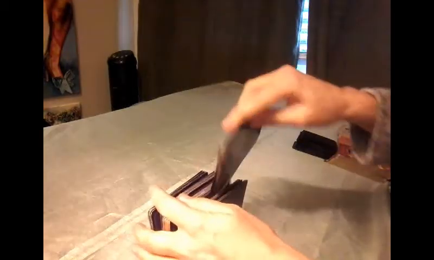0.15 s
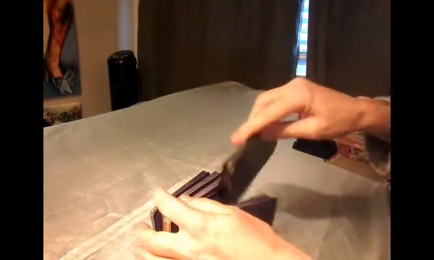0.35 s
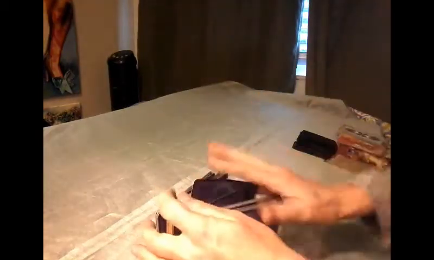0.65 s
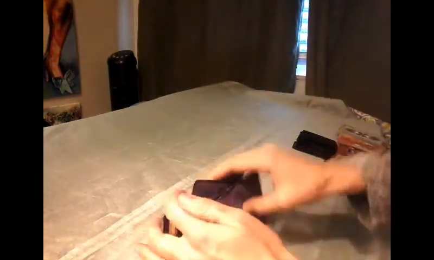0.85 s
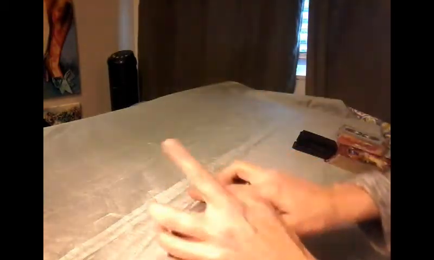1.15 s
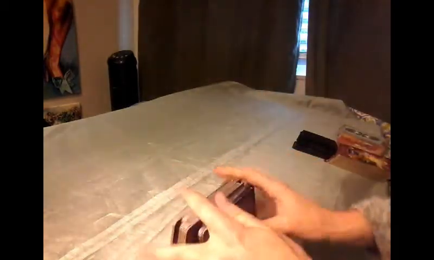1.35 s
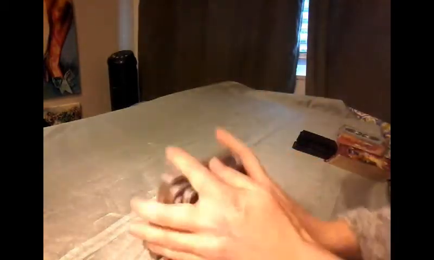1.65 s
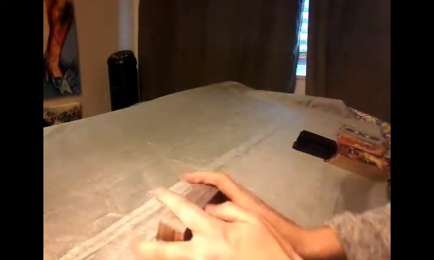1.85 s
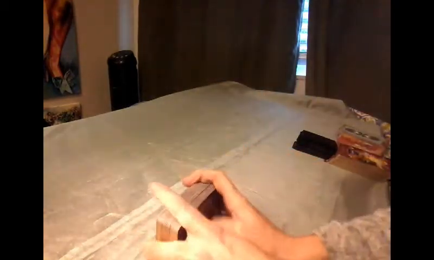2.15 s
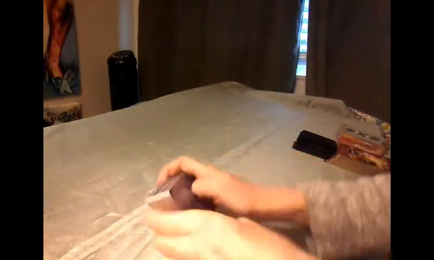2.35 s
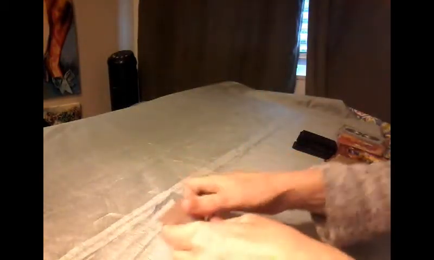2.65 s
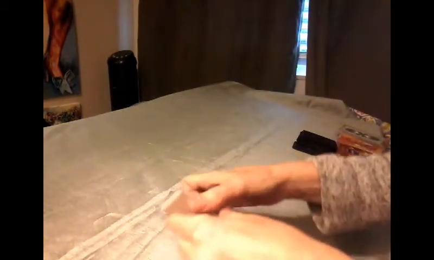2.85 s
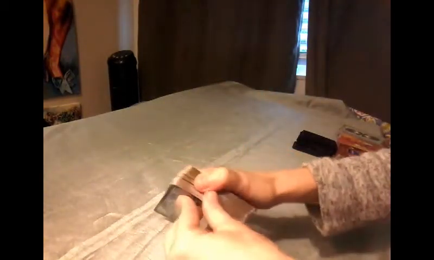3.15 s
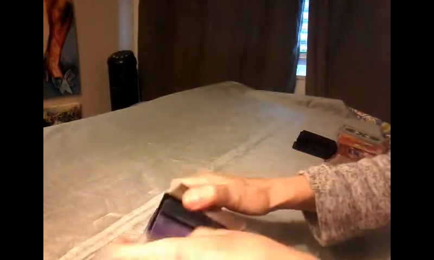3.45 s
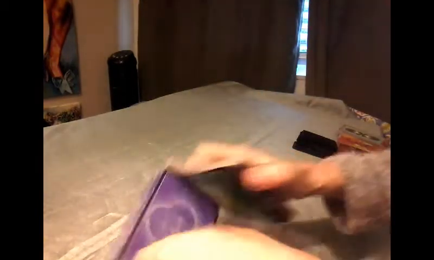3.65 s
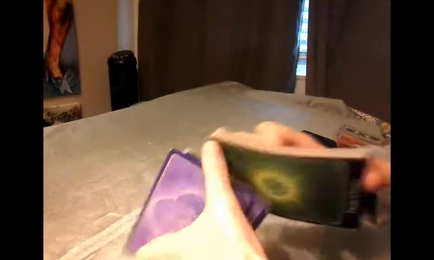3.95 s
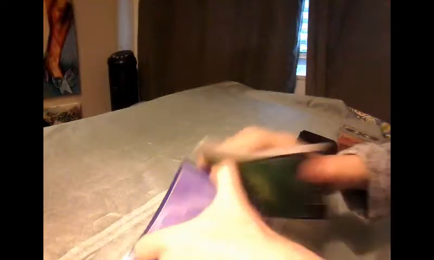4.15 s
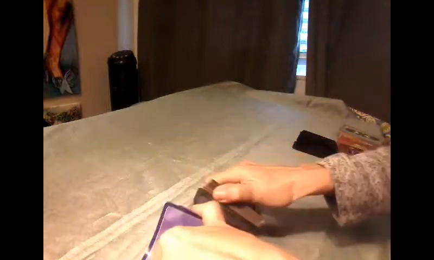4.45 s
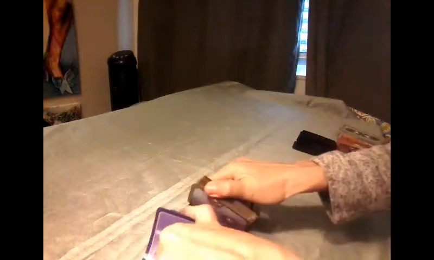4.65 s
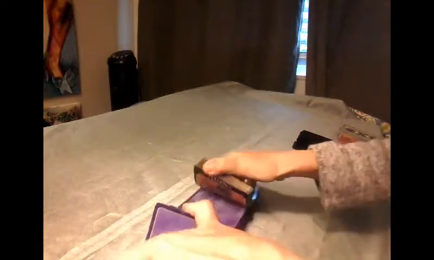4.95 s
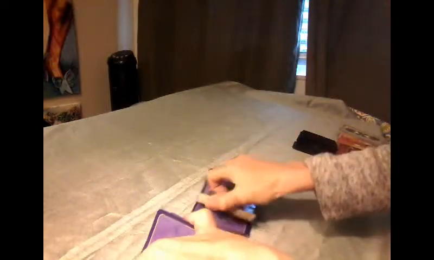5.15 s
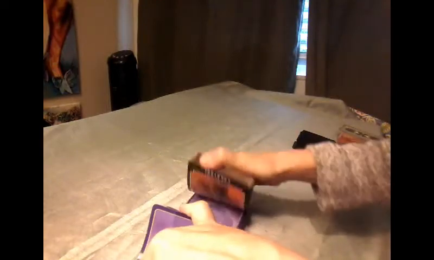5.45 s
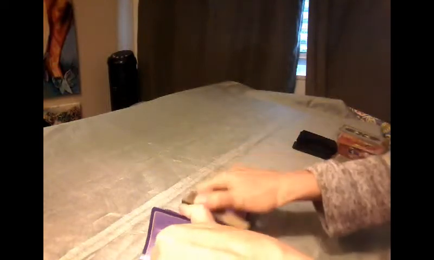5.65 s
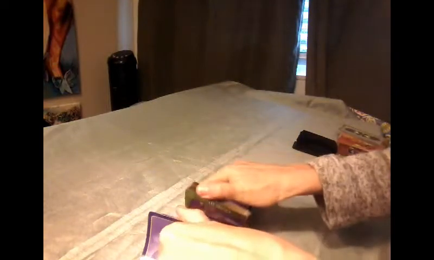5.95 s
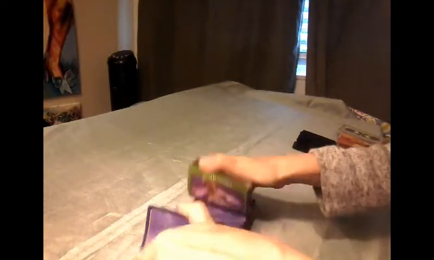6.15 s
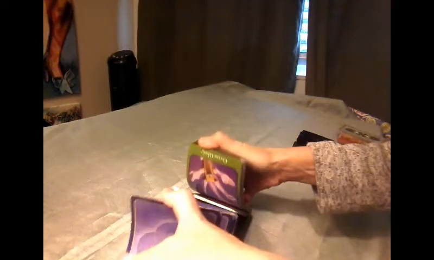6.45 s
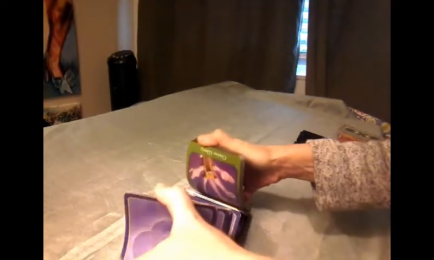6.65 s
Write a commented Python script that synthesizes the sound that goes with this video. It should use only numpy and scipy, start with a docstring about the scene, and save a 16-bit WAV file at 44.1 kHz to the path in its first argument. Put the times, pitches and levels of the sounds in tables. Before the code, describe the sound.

Large cards brush softly, then packets drop and knock square with dull thuds; later two crisp riffling snaps, over a humming fan in a small room.

```python
"""Card faces brush softly, then packets of large cards drop and are knocked square with dull thuds.
The deck is close to the microphone, on a cloth-covered table in a small, quiet room with a humming fan.
Twice a bent packet is let go and its edges snap down one after another; cards slide and tick between.
Blows with random chatter excite resonances of deck, card and pile; slides and fan air are coloured
noise, the hum is wavering sines, and decaying noise gives the room's echoes."""
import sys
import numpy as np
from scipy import signal
from scipy.fft import rfft, irfft
from scipy.io import wavfile
from scipy.ndimage import uniform_filter1d

SR = 44100
rng = np.random.default_rng(int(sys.argv[2]) if len(sys.argv) > 2 else 0)


def log_audio(samples):
    """Write samples as a 16-bit WAV file to the path given in sys.argv[1]."""
    # one column per channel
    frames = np.atleast_2d(samples).T
    # limit to full scale, then quantise
    limited = np.clip(frames, -1, 1)
    pcm = np.round(limited * 32767).astype(np.int16)
    wavfile.write(sys.argv[1], SR, pcm)


N = 300321
TIME = np.arange(N) / SR

# strokes of card face over card face: middle_s, half_length_s, level_db
SLIDES = [(0.316, 0.074, -59.5), (0.554, 0.049, -57), (0.866, 0.031, -40.5), (1.071, 0.066, -55.5),
          (1.489, 0.034, -48), (2.232, 0.063, -50), (2.42, 0.0082, -47.5), (2.506, 0.11, -58),
          (3.614, 0.028, -58), (4.22, 0.014, -59), (4.467, 0.025, -45), (4.522, 0.035, -54),
          (5.02, 0.054, -55), (5.229, 0.044, -53), (5.588, 0.023, -57), (6.457, 0.031, -59.5),
          (6.792, 0.023, -48.5)]


def from_db(db):
    """Decibels to gain."""
    return 10 ** (np.asarray(db) / 20)


def unit(x):
    """Scale to rms 1."""
    return x / np.sqrt(np.mean(x ** 2))


def burst(x, db):
    """Scale a short sound so that its energy, spread over 3 ms, has this level."""
    return x * from_db(db) * np.sqrt(0.003 * SR / np.sum(x ** 2))


def add(track, start_s, x):
    """Mix x into the track at start_s."""
    i = int(np.clip(start_s * SR, 0, N - 1))
    track[i:i + len(x)] += x[:N - i]


def colour(x, points):
    """Filter by a (Hz, dB) spectrum, interpolated over log frequency."""
    hz, db = np.transpose(points)
    bins_hz = np.maximum(np.fft.rfftfreq(len(x), 1 / SR), 1)
    gain = from_db(np.interp(np.log(bins_hz), np.log(hz), db))
    return irfft(rfft(x) * gain, len(x))


def ring(x, modes):
    """Sum of damped resonances; neighbours swing in opposite directions."""
    out = np.zeros(len(x))
    for k, (hz, width_hz, db) in enumerate(modes):
        b, a = signal.iirpeak(min(hz, SR / 2 - 2000), hz / width_hz, SR)
        out += (-1) ** k * from_db(db) * signal.lfilter(b, a, x)
    return out


def soften(x, hz, order=2):
    """Low-pass: a soft contact cannot excite what is faster than itself."""
    return signal.sosfilt(signal.butter(order, hz, fs=SR, output="sos"), x)


def walk(rate_hz):
    """Slow random wander of rms near 1: random steps, smoothed."""
    hold = int(SR / rate_hz)
    steps = np.repeat(rng.standard_normal(N // hold + 1), hold)
    return unit(uniform_filter1d(steps, hold)[:N])


def contact(decay_s, chatter, evenness, size=4096):
    """One blow and the dying chatter of neighbouring cards; evenness 0-1 tames its chance colour."""
    push = rng.standard_normal(size) * np.exp(-np.arange(size) / SR / decay_s)
    push *= chatter / np.sqrt(np.sum(push ** 2))
    push[0] += 1  # the blow itself
    spectrum = rfft(push)
    tint = irfft(np.log(uniform_filter1d(abs(spectrum) ** 2, size=24)))
    tint[size // 2:] = 0  # causal, so the attack stays sharp
    return irfft(spectrum * np.exp(-np.clip(evenness, 0, 1) * rfft(tint)))


def crack(push):
    """The bare edge of a card rings high and briefly."""
    # resonances of a card's stiff edge: centre_hz, width_hz, level_db
    edge = [(4385, 860, 6.5), (5720, 4600, -2), (8720, 3740, -2.5), (15900, 4000, -10.5)]
    return unit(ring(np.diff(push, prepend=0), edge))


def knocks():
    """Thuds of the deck through the cloth: the direct sound and what goes out into the room."""
    # thuds at the table, and one early echo of the first from the ceiling (at 0.623 s):
    # start_s, level_db, contact_cutoff_hz
    thud_list = [(0.5998, -16.5, 2800), (0.6016, -10, 4700), (0.623, -22, 4700), (0.649, -14.5, 2110),
                 (0.792, -33.5, 600), (0.8198, -33.5, 2160), (0.8251, -27, 2170), (0.88, -26, 1070),
                 (1.2633, -29.5, 2170), (1.2715, -33.5, 2720), (1.2803, -31, 2260), (1.8028, -24, 1680),
                 (1.8097, -11, 1650), (1.821, -14, 1840), (1.829, -16, 1820), (1.8371, -16.5, 2790),
                 (1.845, -10.5, 3210), (1.8505, -19, 3750), (2.2372, -37.5, 1790), (2.2633, -33, 2420),
                 (2.2751, -30, 2050), (2.522, -53, 352), (4.4744, -31, 1100), (4.541, -29, 1320),
                 (5.719, -37, 805), (5.774, -34.5, 700), (5.7973, -29.5, 574)]
    # resonances of the deck on the table: centre_hz, width_hz, level_db
    deck = [(123.3, 24, 3.5), (258, 118, 3.5), (646, 370, 3), (1520, 400, 0), (2320, 550, -2),
            (4000, 540, -6.5), (5950, 840, -7)]
    firm_db, firm_hz = -12, 2500  # the reference, a firm knock
    direct, send = np.zeros(N), np.zeros(N)
    for start_s, db, cutoff_hz in thud_list:
        lighter_db = firm_db - db
        # a lighter knock has more bare card edge in it
        edge_db = -36.5 + 0.63 * lighter_db
        # a crisper or firmer one fills the room more: 3 dB per octave, 0.12 dB per dB
        room_db = 3 * np.log2(cutoff_hz / firm_hz) - 0.12 * lighter_db
        push = contact(decay_s=0.0023, chatter=1.0, evenness=0.51)
        # the cloth takes the top off; a trace of bare card edge gets through
        body = unit(soften(ring(push, deck), cutoff_hz, order=6))
        thud = burst(body + from_db(edge_db) * crack(push), db)
        add(direct, start_s, thud)
        add(send, start_s, thud * from_db(room_db))
    return direct, send


def card(db, flex_hz, crack_db, ring_s, pile_db):
    """A card flexes with one broad note, cracks at its edge and nudges the pile under it."""
    # resonances of the pile under the card: centre_hz, width_hz, level_db
    pile = [(1334, 206, 0), (800, 620, -6.5), (524, 324, -7), (165, 230, -12.5)]
    push = contact(ring_s, chatter=2.05, evenness=0.59)
    flex = ring(push, [(flex_hz, 900, 0)])  # 900 Hz wide
    body = flex - from_db(pile_db) * ring(push, pile)
    return burst(unit(soften(body, 5900)) + from_db(crack_db) * crack(push), db)


def snaps():
    """A bent packet is let go: its cards snap down one after another."""
    # cards snapping down: start_s, level_db, flex_hz, edge_crack_db, ring_s
    falling_cards = [(4.537, -30.5, 1800, 0, 0.0052), (4.543, -34.5, 1900, -1, .0024),
                     (4.5725, -15, 2270, -23, 0.00089), (4.5744, -15.5, 3920, -13, 0.0016),
                     (4.6249, -13, 2500, -1.5, 0.003), (4.626, -15.5, 3500, -14, 0.0028),
                     (4.635, -13.5, 1900, -20, 0.0033), (4.651, -19.5, 1520, -13, 0.0035),
                     (4.6836, -15, 2100, -13, .0035), (4.693, -32, 2300, -6, .002),
                     (4.7027, -12, 2400, -3, 0.0013), (4.712, -25, 2610, 5, .005),
                     (4.7313, -15.5, 3600, 1.5, .0007), (4.741, -17, 2240, -2, .003),
                     (5.8141, -13, 2340, -1.5, 0.0015), (5.829, -14, 3200, -1.5, 0.0019),
                     (5.8366, -26.5, 3400, 1.5, .002), (5.8615, -12.5, 2800, -3.5, 0.00049),
                     (5.868, -12, 2900, 11.5, 0.0074), (5.8788, -13, 2040, -8.5, .002),
                     (5.89, -22.5, 2300, -2.5, .004), (5.9496, -11, 2350, -1.5, 0.00042),
                     (5.9543, -13, 2400, -13, 0.001), (5.964, -25, 2600, -9, .004),
                     (6.0072, -17, 2240, -4, 0.00091)]
    out = np.zeros(N)
    for start_s, db, flex_hz, crack_db, ring_s in falling_cards:
        add(out, start_s, card(db, flex_hz, crack_db, ring_s, pile_db=-0.5))
    return out


def slides():
    """Card on card: dense tiny slips that swell and fade with each stroke."""
    # spectrum of the rubbing: frequency_hz, density_db (per Hz)
    rub = [(300, 9.5), (1000, 11), (2500, 4.5), (5000, -0.5), (9000, -2), (15500, 1.5)]
    pressure = np.zeros(N)
    for middle_s, half_s, db in SLIDES:
        pressure += from_db(db) * np.exp(-((TIME - middle_s) / half_s) ** 2)
    # random strength makes the noise grainy
    grain = np.exp(np.minimum(rng.exponential(size=N), 4) / 2)
    slips = rng.standard_normal(N) * grain
    return unit(colour(slips, rub)) * pressure * from_db(1.6 * walk(90))


def tick(db, crack_db):
    """An unbent card catches: always the same note; a stronger catch sets more cards chattering."""
    stronger_db = db + 47  # relative to a faint catch at -47 dB
    ring_s = 0.0016 * 2 ** (stronger_db / 17)  # doubles every 17 dB
    pile_db = -1.5 + 0.7 * stronger_db  # a stronger catch also nudges the pile more
    return card(db, 2290, crack_db, ring_s, pile_db)


def ticks():
    """Card edges catch lightly; faint stray ones scatter around all but the shortest sliding strokes."""
    # clear catches: start_s, level_db, edge_crack_db
    catches = [(.593, -34.5, 11), (.79, -52, -2.5), (1.0104, -50, 1), (1.036, -51, 9), (1.083, -55, 17),
               (1.098, -49, 7), (2.058, -47.5, 2), (2.1074, -50, 7), (2.1733, -45, -3), (2.186, -34, -0.5),
               (2.2408, -40.5, -6), (2.2752, -35.5, -6.5), (2.42, -49, 12), (2.5396, -51, 5),
               (3.1023, -50.5, -1), (3.1641, -49, 2), (3.2937, -41.5, 2), (3.6044, -45, -1),
               (4.451, -37.5, 6), (4.4737, -29.5, -4.5), (4.4884, -34.5, 9), (4.5203, -38.5, 6.5),
               (4.563, -31.5, 5.5), (5.501, -42.5, -5), (5.578, -38, -3), (5.602, -37, -12.5),
               (5.698, -35, -11.5), (5.753, -42.5, -2.5), (5.777, -36, -9), (5.822, -25.5, 12),
               (6.249, -41, -15), (6.6928, -42, -3.5)]
    strays_per_s = 42
    out = np.zeros(N)
    for start_s, db, crack_db in catches:
        add(out, start_s, tick(db, crack_db))
    for middle_s, half_s, db in SLIDES:
        # place in half lengths from the middle, from before the stroke to its end; and strength
        chance = rng.uniform(-1.4, 1, size=(16, 2))
        for place, strength in chance[:int(2 * half_s * strays_per_s)]:
            stray = tick(db - 3.5 + 2.5 * strength, crack_db=9)
            add(out, middle_s + place * half_s, stray)
    return out


def room(x, early_db, early_s, tail_db, t60_s, treble_t60_s, gap_s):
    """The ceiling answers after a short gap with a scattered echo; the walls ring on briefly."""
    # colour of the room's answer: frequency_hz, level_db
    room_colour = [(60, -17), (130, 0), (300, 2), (600, -2), (1000, -1), (2000, 0.5), (4000, -0.5),
                   (8000, -2.5), (15000, 0)]
    t = np.arange(SR // 2) / SR
    near, far = rng.standard_normal((2, len(t)))
    early = near * np.exp(-t / early_s) * (t > gap_s)
    low = soften(far, 4500)
    treble = far - low
    tail = low * 1000 ** (-t / t60_s) + treble * 1000 ** (-t / treble_t60_s)
    tail *= 1 - np.exp(-(t / 0.0041) ** 2)  # reflections take a moment to build up
    echo = from_db(early_db) * unit(early) + from_db(tail_db) * unit(tail)
    echo /= np.sqrt(len(t))
    return signal.fftconvolve(x, colour(echo, room_colour))[:N]


def fan():
    """A wavering hum of fan and mains lines over a soft rush of air."""
    # spectrum of the air: frequency_hz, density_db (per Hz)
    air_colour = [(25, -20.5), (60, -23.5), (92, -16.5), (118, -9), (150, -9.5), (300, -7.5), (450, -11.5),
                  (900, -12.5), (1150, -17), (1750, -17.5), (3500, -30), (6000, -36), (10000, -39),
                  (16000, -25.5)]
    # fan and mains lines, before the background level: frequency_hz, level_db
    hum_lines = [(119.7, -60), (137, -66), (174, -65.5), (240, -64), (257, -65.5), (288, -72.5), (307, -67),
                 (378, -72), (410, -66.5), (445, -62.5), (479, -69.5), (598, -80), (890, -84)]
    # background level over time: time_s, gain_db
    background = [(0, 1.5), (5.7, 1.9), (6.1, -0.5), (6.8, -3)]
    air = unit(colour(rng.standard_normal(N), air_colour))
    air *= from_db(-52.5 + 0.28 * walk(6))
    hum = np.zeros(N)
    for hz, db in hum_lines:
        level = np.sqrt(2) * from_db(db + 0.61 * walk(7))  # rms to peak
        phase = 2 * np.pi * np.cumsum(hz + 1.233 * walk(7)) / SR  # pitch wavers by about 1.2 Hz rms
        hum += level * np.sin(phase)
    return (air + hum) * from_db(np.interp(TIME, *np.transpose(background)))


def scene():
    """Cards close to the microphone, the room around them and the fan behind."""
    thuds, thud_send = knocks()
    cards = snaps() + slides() + ticks()
    thud_room = room(thud_send, early_db=-13.5, early_s=0.024, tail_db=-3.5,
                     t60_s=0.29, treble_t60_s=0.26, gap_s=0.019)
    card_room = room(cards, early_db=-10.0, early_s=0.013, tail_db=-7,
                     t60_s=0.26, treble_t60_s=0.26, gap_s=0.0075)
    return (thuds + cards + thud_room + card_room + fan())[None]


def record(dry):
    """The microphone colours the treble; the recorder thins the bass, clips and cuts the top."""
    # microphone port, with a peak and a notch in the top octave: frequency_hz, level_db
    microphone = [(8000, 0), (9900, 2.5), (10900, -9.5), (11900, -17), (13500, -11.5), (15500, -15)]
    x = colour(dry[0], microphone)
    x = signal.sosfilt(signal.butter(2, 55, "highpass", fs=SR, output="sos"), x)
    x = np.clip(x, -1, 1)  # full scale
    top_cut = signal.ellip(8, 0.2, 70, 15900, fs=SR, output="sos")  # steep, above 15.9 kHz
    return signal.sosfilt(top_cut, x)[None]


dry = scene()
out = record(dry)
log_audio(out)
```